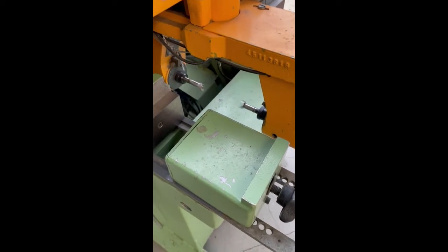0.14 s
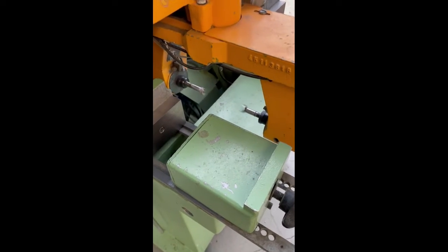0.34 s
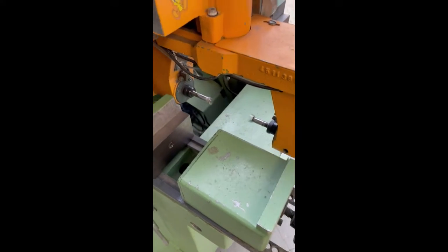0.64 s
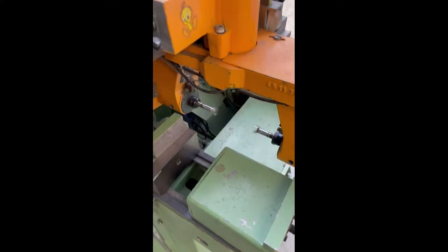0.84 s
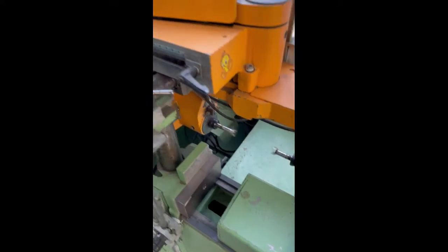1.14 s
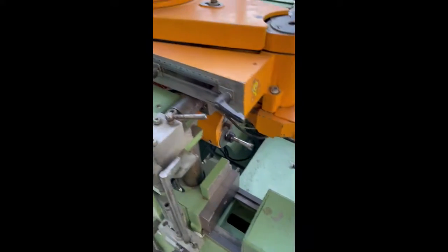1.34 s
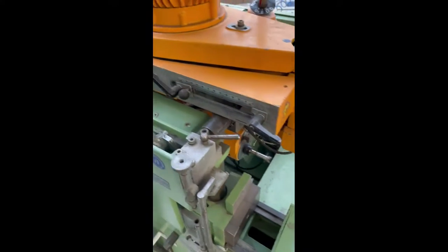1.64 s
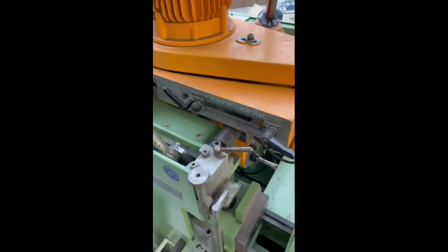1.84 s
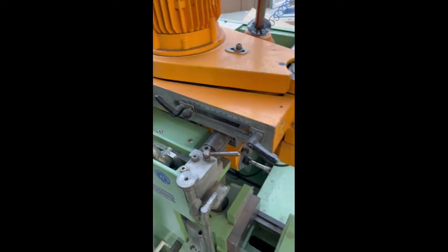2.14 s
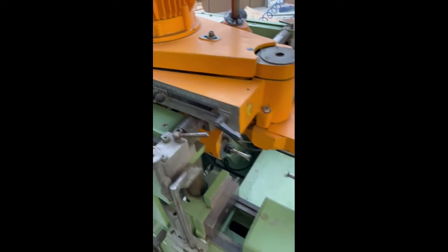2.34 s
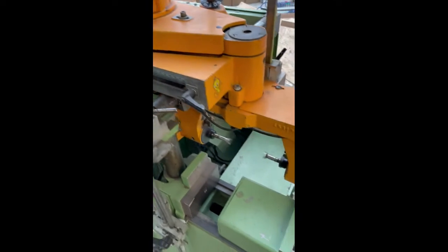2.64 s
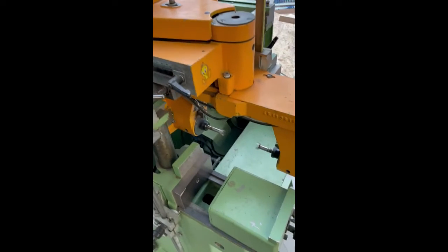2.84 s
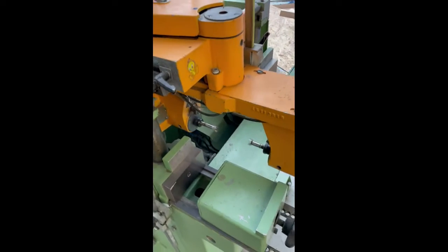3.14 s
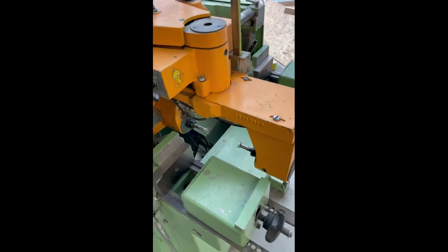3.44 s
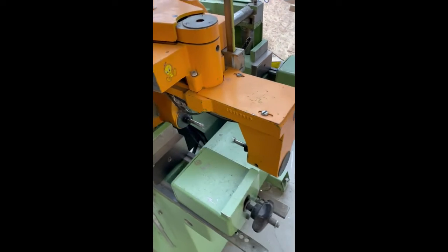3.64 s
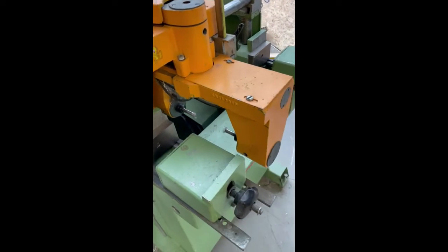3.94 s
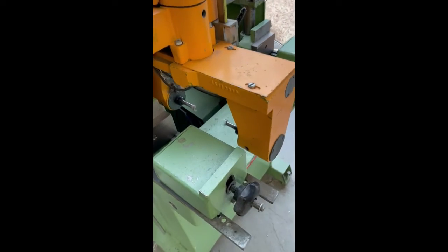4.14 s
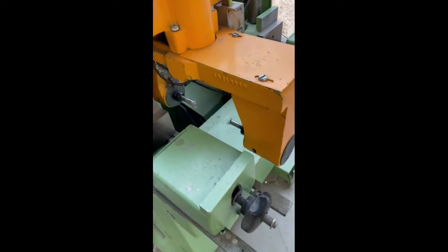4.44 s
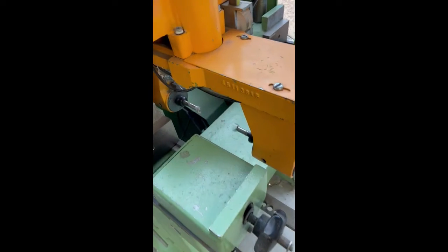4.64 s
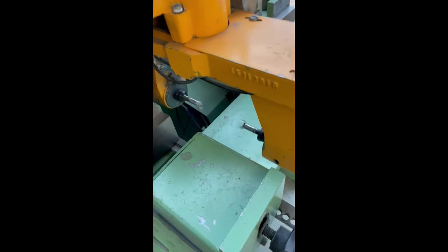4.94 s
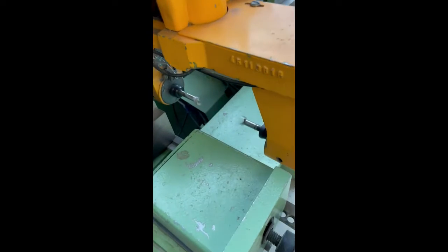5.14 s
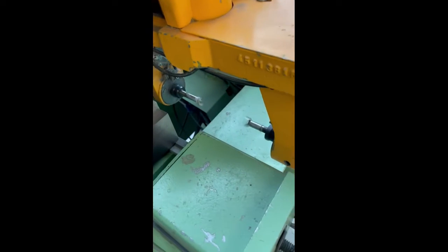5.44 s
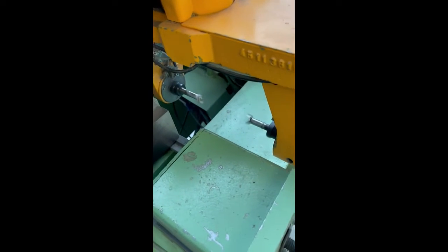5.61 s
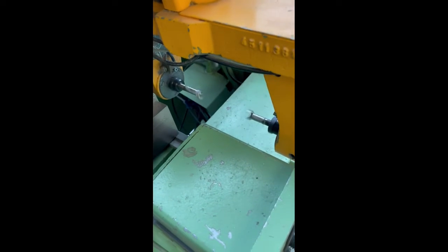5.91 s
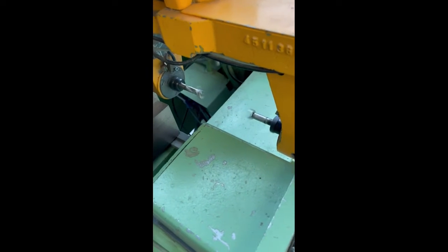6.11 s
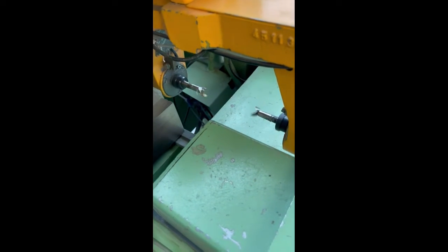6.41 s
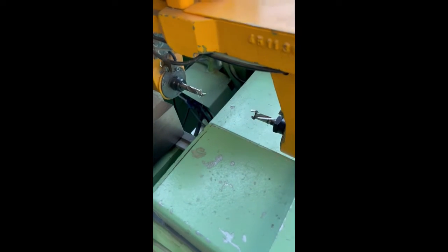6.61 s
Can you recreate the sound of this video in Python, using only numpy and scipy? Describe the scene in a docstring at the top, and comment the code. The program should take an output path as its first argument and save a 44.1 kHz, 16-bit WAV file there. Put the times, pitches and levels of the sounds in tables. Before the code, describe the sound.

Constant electric machine noise: a nasal, high whine near four kilohertz over a hum, with rough bearing hiss. Individual tones swell and fade as the handheld microphones move around the machine. Late on, a dull switch knock cuts the drive and the whine glides quickly downward, flaring on metal resonances. Soft knocks, a quiet hum, a thin whistle and broad workshop noise are left. Close, wide stereo.

```python
"""In a workshop, close to a belt-driven milling spindle: it runs at full speed, is switched off and coasts to rest.
Multiples of the shaft speed give the hum and the whine of a 24-tooth pulley; shaped noise gives the bearing roar.
As it slows, falling tones ring fixed resonances, and a steady hum and a high whistle come up and stay.
The handheld microphones wander, so each tone swells and fades; short dull bursts, gusts and shop noise lie around."""
import sys
import numpy as np
from scipy import signal
from scipy.fft import rfft, irfft, next_fast_len
from scipy.io import wavfile

SR = 44100
rng = np.random.default_rng(int(sys.argv[2]) if len(sys.argv) > 2 else 0)


def bounce(signal):
    """Save signal as a 16-bit WAV file at the path given by the first command-line argument."""
    frames = np.transpose(np.atleast_2d(signal))
    limited = np.clip(frames, -1, 1)
    pcm = np.round(limited * 32767).astype(np.int16)
    wavfile.write(sys.argv[1], SR, pcm)


N = 298557  # samples

# An order is a number of cycles per shaft turn. Swells are lists of (t/s, peak level/dB, 1/e half length/s).
# Crossings are (order, peak level/dB, 1/e spread/turns per s): a falling order meets a resonance.
# weaker spindle tones: order, level/dB at full speed
FAINT_ORDERS = [(1.2, -47), (1.495, -49), (2, -56), (3, -55), (4.5, -55.5), (5, -57.5), (8, -61), (9, -59),
                (22.8, -51), (23.7, -49.5), (24.3, -53), (26.55, -57), (28, -57), (30.1, -53), (33.5, -55),
                (39, -55)]
# shaft sidebands round the second and third tooth overtones: order, level/dB re that overtone's level
OVERTONE_2 = [(46, -1), (47, 0), (48, 0), (49, -1), (50, -4)]
OVERTONE_3 = [(68, -9), (69, -9), (70, -5), (74, -6), (75, -10)]
# casting resonances that gliding tones light up: f/Hz, width/Hz, lift/dB
CASTING = [(84, 24, 11), (115, 24, 5), (170, 16, 10.5), (240, 79, 9), (285, 50, 7), (870, 90, 7),
           (950, 80, 15), (1060, 70, 7), (1330, 400, 3), (1760, 110, 9.5), (1950, 80, 5), (2040, 50, -6),
           (2160, 220, 15), (2390, 90, -13), (2560, 60, 12), (2630, 40, -8), (2730, 110, 11),
           (2820, 40, -10), (3040, 290, 12), (3270, 130, 7), (3450, 120, -11), (3640, 150, 12),
           (3901, 163, 14.5), (5600, 160, -8), (5700, 1200, 17), (9500, 2100, 23), (11700, 380, 11.5)]
# noise colours, each scaled to unit power before use: f/Hz, density level/dB per Hz
RUMBLE_COLOUR = [(60, -25), (130, -14), (300, -5.5), (360, -13), (560, -7.5), (640, -8.5), (740, 0),
                 (860, -8.5), (1100, -6), (1350, -14.5), (1700, -18.5)]
ROAR_COLOUR = [(1100, -52), (1400, -15), (1800, -6.5), (2300, -4.5), (2900, -19.5), (3400, 3), (3850, 3),
               (4400, 1), (5000, -1), (5800, -4.5), (7000, -1.5), (8200, -13)]
HISS_COLOUR = [(6600, -42), (7000, -25), (7600, -16), (8300, 1.5), (8800, 5.5), (10500, 0), (11600, 4.5),
               (12500, 2.5), (13400, 4), (14200, -6), (15000, 9.5), (16500, 9.5)]
WORKSHOP_COLOUR = [(100, -25), (750, -11), (1200, -6), (2500, 1), (3500, 1.5), (4000, -11), (5800, 5.5),
                   (7000, -2.5), (8500, 1), (10800, 3.5), (11650, -6), (12500, 5), (13700, -2),
                   (14300, 7.5), (16500, 4)]
COVER_COLOUR = [(1450, -10.0), (1750, 3.5), (2000, -8)]
RASP_COLOUR = [(4500, -22), (4850, 3.5), (5400, 5.0), (5900, -10)]
HOUSING_COLOUR = [(2500, -7.0), (2800, 1.0), (3200, 3.0), (3500, -29)]
WIND_COLOUR = [(30, -40), (45, -8.0), (80, -5.0), (130, -1.5), (170, -3)]
# steady tones left after the switch-off: f/Hz, level/dB
AFTER_TONES = [(204.6, -52.5), (413, -53.5), (619.1, -53), (705.2, -46), (829.0, -46.5), (1599, -58.5),
               (2013, -55), (3295, -61), (3488, -54), (5787, -52), (9981, -56), (11353, -58), (11510, -53),
               (11547, -47), (11579, -47), (11612, -50), (11644, -47), (11676, -40.5), (11740, -52),
               (11800, -51), (12026, -52)]
# short dull bursts, knocks and last flares of the falling tones: t/s, level/dB, f/Hz, t60/s
DULL_BURSTS = [(0.017, -28, 140, 0.11), (3.749, -35, 130, 0.41), (5.421, -34, 750, 0.087),
               (5.435, -42, 830, 0.079), (5.464, -24, 770, 0.042), (5.477, -35, 805, 0.12),
               (5.43, -39, 48, 0.24), (5.52, -44, 50, 0.15), (6.365, -43, 460, 0.14),
               (6.37, -36, 940, 0.11), (6.448, -39, 247, 0.16), (6.58, -41.5, 70, 0.22)]
# stereo image by pitch: f/Hz, left lead/rad, likeness/0-1, left re right level/dB
STEREO = [(20, 0, .997, 0), (70, 0, .99, 0), (170, -.08, .998, .4), (400, -.3, .97, 1.4),
          (780, -.5, .9, -2), (1100, -.3, .93, -2.7), (1500, -.1, .96, -1), (1800, 0, 1, 0),
          (2250, 0, 1, 0), (3000, 1.3, .5, -1), (3500, .5, .45, 0), (3850, .4, .8, -.5), (4500, 0, .1, 0),
          (4900, -.9, .4, .5), (5400, .3, .72, .5), (6800, 2.7, .75, 0)]
# stereo image above 7 kHz, with bands in step or opposed: f/Hz, left lead/half turns, likeness/0-1
STEREO_HIGH = [(6980, 1, 1), (8230, 1, 1), (8450, 1.15, .72), (10200, 1.8, .78), (10420, 2, 1),
               (11330, 2, 1), (11900, 2.25, .8), (13600, 2.87, .78), (13850, 3, 1), (14500, 3, 1),
               (15000, 3.13, .85), (16500, 3.4, .8)]
# tooth tone at the wandering microphones: t/s, level/dB at full speed
WHINE = [(0.0, -28.5), (0.15, -26.5), (0.49, -28), (0.63, -29.5), (0.68, -33.5), (0.88, -35.5),
         (0.93, -32.5), (1.09, -33.5), (1.2, -52), (1.3, -35.5), (1.52, -28), (1.65, -28), (1.81, -35),
         (2.01, -37), (2.17, -30), (2.26, -33), (2.39, -31), (2.45, -49), (2.48, -44), (2.63, -32),
         (2.83, -29.5), (3.22, -30.5), (3.35, -35.5), (3.56, -32.5), (3.62, -31.5), (3.79, -34.5),
         (3.84, -45), (3.97, -33), (4.02, -44), (4.19, -40), (4.27, -49), (4.3, -50), (4.47, -57),
         (4.56, -38), (5.3, -24.5)]
# once-per-turn hum: t/s, level/dB at full speed
HUM = [(0, -46), (.5, -36.5), (1.7, -37.5), (1.87, -41.5), (2.5, -40), (3.2, -35), (3.7, -38.5),
       (3.81, -47), (3.95, -40), (4.93, -40), (5.1, -46), (5.3, -47)]
# spindle tones that swell as the microphones wander: order
SWELLING_ORDERS = 1.8, 2.555, 3.6, 6, 18, 19, 20, 21, 22, 23, 25, 26, 27, 29.11, 71, 72, 73
# one row for each of those orders: resting level/dB, swells
ORDER_SWELLS = [(-48.5, [(.25, -46, 0.31), (2.3, -50, 0.5), (5.3, -42, 1)]), (-59.5, [(2.2, -50.5, 0.71)]),
                (-58.5, [(1.6, -49.5, 0.78), (3.8, -49, 0.6)]), (-78, [(.6, -55, 1.2), (2.8, -73, 0.37),
                (4.4, -46.5, 1.4)]), (-54, [(.4, -46.5, 0.73), (1.4, -53, 0.18), (2.6, -45, 0.32),
                (3.75, -44.5, 0.13), (4.3, -44.5, 0.38), (4.75, -47, 0.18)]), (-68, [(1.1, -46, .3),
                (2.9, -47.5, .5), (4.3, -55.5, 0.45)]), (-64, [(.7, -44.5, .7), (2.5, -43, .2),
                (3.1, -48, 0.25), (4.0, -49, 0.32), (5.1, -51, .4)]), (-68, [(.3, -52, 0.26),
                (1.5, -45.5, 0.32), (2.3, -47, 0.19), (2.8, -48, .3), (3.7, -48, .15), (4.5, -52, 0.27),
                (5.2, -40.5, 0.33)]), (-53, [(.4, -42, .5), (1.5, -53, 0.23), (2.8, -47, 0.16),
                (4.1, -40.5, 0.16), (4.7, -45, .15)]), (-54, [(.45, -38, 0.42), (1.15, -43, .15),
                (1.95, -37, 0.25), (2.7, -41.5, .3), (3.7, -46, .12), (4.1, -47, .15), (5.15, -38, 0.45)]),
                (-51, [(1.05, -37, 0.11), (2.55, -41, .12), (2.95, -41.5, 0.4), (4.3, -42, 0.3),
                (5.1, -36.5, 0.34)]), (-67, [(.2, -45, 0.39), (1.1, -37, 0.46), (2.75, -43, 0.25),
                (3.4, -43.5, 0.22), (5.1, -46, 0.55)]), (-53, [(1.25, -50.5, 0.75), (2.4, -45, 0.24),
                (3.3, -49, 0.17), (5.1, -44, 0.46)]), (-74, [(1.4, -45.5, 0.45), (2.9, -45, 0.65)]),
                (-48.5, [(1.2, -50.5, 0.3), (2.5, -55, 0.62), (3.2, -50, .15), (4.2, -47, 0.25)]),
                (-55.5, [(.2, -39.5, 0.25), (.9, -41, 0.19), (1.4, -48, 0.63), (2.2, -42, .3),
                (2.95, -41, 0.17), (3.6, -57, .3), (5.2, -44, 0.11)]), (-63, [(.5, -44, 0.66),
                (1.15, -43, 0.32), (2.1, -47, 0.53), (3, -45, 0.38), (5.15, -46, 0.13)])]
# third tooth overtone, cover, rough band near 5 kHz, housing: resting level/dB, swells
OVERTONE_3_SWELLS = -55, [(.4, -47, .7), (2.95, -47, .35), (5.1, -49, 0.3)]
COVER_SWELLS = -69, [(1.7, -45.5, 0.81), (3.6, -51.5, 0.99)]
RASP_SWELLS = -63, [(1.9, -43.5, 0.58), (2.9, -44.5, 0.68), (5.1, -49, .3)]
HOUSING_SWELLS = -58, [(.6, -40, 0.72), (2.9, -43.5, 0.67), (4.2, -45, 0.76), (5.3, -40, 0.5)]
# closeness to the bearings: t/s, level/dB added to their noise
NEARNESS = [(0, 1), (.9, 1), (2.1, -1.2), (3.05, -1), (4.1, -2.5), (4.6, 0), (5.3, 4), (5.6, 5.5),
            (6.77, 7)]
# microphone drift towards the machine: t/s, speed/m per s
APPROACH = [(0, -.07), (.5, .04), (.75, -.13), (1.1, -.21), (1.6, -.2), (2.1, .05), (2.7, .07), (3.3, -.13),
            (3.55, -.13), (3.75, .09), (4.3, .16), (4.7, .06), (5.3, .08)]
# crossings of seven resonances
BOOM_CROSSINGS = [(1.65, -50, 15), (1.95, -42, 17), (2.57, -45, 6), (3.2, -51, 9), (4.1, -48, 14),
                  (5.2, -49, 4.5), (24, -54, 4.5)]
GUARD_CROSSINGS = [(16.3, -49, 4), (17.2, -48, 3), (18.1, -38, 2.6), (19.4, -42, 3.5), (21.2, -45, 2.5),
                   (24, -45, 5), (48, -56, 13)]
PANEL_CROSSINGS = [(45, -45, 2), (47.8, -38, 3), (53, -46, 3)]
BRACKET_CROSSINGS = [(33, -47, 8), (39, -50, 8), (48, -48, 5)]
LID_CROSSINGS = [(32, -46, 7), (36, -47, 7)]
COVER_CROSSINGS = [(24, -39, 2.7), (47.2, -47.5, 2.6)]
HOUSING_CROSSINGS = [(23.9, -35, 12), (46.5, -38, 7)]
# narrow and broad bearing bands, forward as the microphones pass: f/Hz, width/Hz, resting level/dB, swells
RINGING_BANDS = [(4825, 84, -52, [(1.3, -42, 0.17), (5.1, -53, .2)]), (4900, 130, -54, [(2.7, -45, .1)]),
                 (5415, 190, -57.5, [(2.0, -52, .4), (4.9, -51, .3)]), (6000, 250, -64, [(0.4, -52, 0.5)]),
                 (11500, 2000, -44, [(.9, -38, 0.76), (3, -46, .3), (5.2, -49, .2)])]
# gusts over the microphones: t/s, peak level/dB
GUSTS = [(0.0, -45), (0.2, -50), (0.46, -49), (1.05, -54), (1.75, -54), (3.74, -47.5), (5.47, -50),
         (5.77, -53.5), (6.2, -51.5), (6.77, -52)]

FULL_TPS, OFF_S = 160.18, 5.316  # full speed in turns per s, switch-off
FRICTION_TPS2, DRAG_PER_TURN = 117, .00165  # braking
# fading in dB per decade of speed, down to this share of full speed; orders below 10 lose only a part of it
SLOWING_DB, SLOWEST_SHARE, LOW_SLOWING_SHARE = 35.5, .37, .5
STOP_TPS = 20  # below this speed the tones fade further, in proportion to speed
BELT_LOSS_DB = 80  # orders between 1 and 2 die with the cube of the speed lost
OVERTONE_2_DB, OVERTONE_LOSS_DB = -41.5, 13  # level at full speed; extra loss of both overtones by standstill
SIDEBAND_LOSS_DB = 2.5  # off load, per order away from the tooth tones
SIDEBAND_SHAKE_RAD, MOTOR_THROB_DB = .7, 2.5  # phase flutter; throb once per motor turn
SOUND_M_PER_S = 343
RUMBLE_DB, ROAR_DB, HISS_DB, SHOP_DB = -43, -36, -32.5, -35  # at full speed, before nearness
RUMBLE_LOSS_DB, ROAR_LOSS_DB, HISS_LOSS_DB, HOUSING_LOSS_DB = 6, 18.5, 24, 14  # by standstill
RUMBLE_NEAR = .36  # share of the nearness that the bass follows
# f/Hz, width/Hz
BOOM, GUARD, PANEL, BRACKET, LID = (238, 28), (2110, 69), (3700, 42), (4400, 60), (4850, 60)
BOOM_CORE_DB, GUARD_CORE_DB = 6, 2  # steady tone re the noise of its resonance
COVER_HZ, HOUSING_HZ, HOUSING_RATTLE_DB = 1750, 3000, 6  # rattle depth is reached at standstill
RINGING_FLICKER_DB, RINGING_LOSS_DB = 2, 60  # spread; loss by standstill
AFTER_S, AFTER_RISE_S = 5.4, .026
WHISTLE_LATER_S, WHISTLE_RISE_S = .09, .12
CALM_DB, GUST_RISE_DB_PER_S, GUST_FALL_DB_PER_S = -60, 122, 32
CUTOFF_HZ = 15740


def spindle_tones():
    """Every tone is a multiple of the shaft speed; coasting, they fade with speed and flare at resonances."""
    speed = shaft_speed()
    # moving towards the machine raises every spindle pitch a little
    heard_speed = speed * (1 + in_time(APPROACH) / SOUND_M_PER_S)
    turns = np.cumsum(heard_speed) / SR
    coarse_speed = speed[::50]
    coarse_share = coarse_speed / FULL_TPS
    loose = np.clip(20 * (1 - speed / FULL_TPS), 0, 1)  # off load, the belt flaps and the tones turn rough
    slowing_db = SLOWING_DB * np.log10(np.clip(coarse_share, SLOWEST_SHARE, 1))
    stopping_db = 20 * np.log10(np.clip(coarse_speed / STOP_TPS, 1e-3, 1))

    def coast_db(order):
        """Change of level from full speed."""
        fading_db = slowing_db * (LOW_SLOWING_SHARE if order < 10 else 1) + stopping_db
        flare_db = casting_db(order * coarse_speed) - casting_db(order * FULL_TPS)
        belt_db = BELT_LOSS_DB * (1 < order < 2) * (1 - coarse_share) ** 3
        return np.repeat(fading_db + flare_db - belt_db, 50)[:N]

    throb_db = MOTOR_THROB_DB * np.sin(2 * np.pi * turns / 5)
    lead = [(1, in_time(HUM)), (24, in_time(WHINE))]
    lead += [(order, swelling(*row)) for order, row in zip(SWELLING_ORDERS, ORDER_SWELLS)]
    out = np.zeros((2, N))
    for order, level_db in lead:
        high = order > 6
        sideband = high and order != 24
        from_tooth = abs((order + 12) % 24 - 12)  # orders to the nearest multiple of 24
        sideband_db = (throb_db - SIDEBAND_LOSS_DB * loose * from_tooth) * sideband
        waver_db = .9 + .7 * sideband + .6 * loose * high
        out += tone(order * turns, level_db + coast_db(order) + sideband_db, waver_db,
                    rate_hz=18., shake_rad=SIDEBAND_SHAKE_RAD * sideband)
    for order, level_db in FAINT_ORDERS:
        high = order > 6
        loose_db = 2 * SIDEBAND_LOSS_DB * loose * high
        out += tone(order * turns, level_db + coast_db(order) - loose_db, 1.5 + 1.2 * high,
                    rate_hz=2., shake_rad=SIDEBAND_SHAKE_RAD * high)

    dulled_db = OVERTONE_LOSS_DB * (speed / FULL_TPS - 1)
    second_db = OVERTONE_2_DB + coast_db(48) + dulled_db
    third_db = swelling(*OVERTONE_3_SWELLS) + coast_db(72) + dulled_db
    for order, relative_db in OVERTONE_2:
        loose_db = SIDEBAND_LOSS_DB * loose * (order == 50)
        out += tone(order * turns, second_db + relative_db - loose_db, 2 + 1.5 * loose, rate_hz=25.)
    for order, relative_db in OVERTONE_3:
        out += tone(order * turns, third_db + relative_db, 3.5, rate_hz=3., shake_rad=SIDEBAND_SHAKE_RAD)
    return out


def shaft_speed():
    """Turns per s: full speed, then braked by steady friction and by air drag that grows as speed squared."""
    scale = np.sqrt(FRICTION_TPS2 / DRAG_PER_TURN)
    rate = np.sqrt(FRICTION_TPS2 * DRAG_PER_TURN)
    coasting_s = np.maximum(np.arange(N) / SR - OFF_S, 0)
    return scale * np.tan(np.maximum(np.arctan(FULL_TPS / scale) - rate * coasting_s, 0))


def casting_db(hz):
    """Lift that the resonances of the machine body give a tone at this pitch."""
    return sum(db / (1 + (2 * (hz - centre_hz) / width_hz) ** 2) for centre_hz, width_hz, db in CASTING)


def bearing_noise():
    """Rumble, roar and hiss throb with the shaft or the motor, a fifth as fast, and sink with speed."""
    speed, near_db = shaft_speed(), in_time(NEARNESS)
    lost = 1 - speed / FULL_TPS
    angle = 2 * np.pi * np.cumsum(speed) / SR
    shaft, motor = np.sin(angle), np.sin(angle / 5)
    rumble_db = RUMBLE_DB - RUMBLE_LOSS_DB * lost + RUMBLE_NEAR * near_db + .23 * shaft + .14 * drift(11.)
    roar_db = ROAR_DB - ROAR_LOSS_DB * lost + near_db + .5 * shaft + .067 * motor + 1.6 * drift(26.)
    hiss_db = HISS_DB - HISS_LOSS_DB * lost + near_db + .72 * shaft + 1. * motor
    out = from_db(rumble_db) * coloured(RUMBLE_COLOUR)
    out += from_db(roar_db) * coloured(ROAR_COLOUR)
    return out + from_db(hiss_db) * coloured(HISS_COLOUR)


def ringing():
    """Narrow and broad flickering bands of bearing noise; they sink quickly once the drive is off."""
    out, white = np.zeros((2, N)), rng.standard_normal((2, N))
    lost = 1 - shaft_speed() / FULL_TPS
    for hz, width_hz, rest_db, swells in RINGING_BANDS:
        level_db = swelling(rest_db, swells) + RINGING_FLICKER_DB * drift(9.) - RINGING_LOSS_DB * lost
        out += from_db(level_db) * noise_band(hz, width_hz, white)
    return out


def rasp():
    """A rough band of noise near 5 kHz that swells, then sinks with speed."""
    lost = 1 - shaft_speed() / FULL_TPS
    return from_db(swelling(*RASP_SWELLS) - ROAR_LOSS_DB * lost) * coloured(RASP_COLOUR)


def cover():
    """Noise of the cover swells as the microphones wander, and again as falling orders cross its resonance."""
    gain = from_db(swelling(*COVER_SWELLS)) + from_db(crossed(COVER_HZ, COVER_CROSSINGS))
    return gain * coloured(COVER_COLOUR)


def housing():
    """Noise of the housing; falling orders shake it and it throbs once per turn, deeper as the shaft slows."""
    speed = shaft_speed()
    lost = 1 - speed / FULL_TPS
    shaft = np.sin(2 * np.pi * np.cumsum(speed) / SR)
    shaken_db = crossed(HOUSING_HZ, HOUSING_CROSSINGS) + HOUSING_RATTLE_DB * lost * shaft
    gain = from_db(swelling(*HOUSING_SWELLS) - HOUSING_LOSS_DB * lost) + from_db(shaken_db)
    return gain * coloured(HOUSING_COLOUR)


def shaken_parts():
    """While the speed falls, rough drive forces ring five fixed resonances; boom and guard have a steady core."""
    out, now = np.zeros((2, N)), np.arange(N) / SR
    parts = [(BOOM, BOOM_CROSSINGS), (GUARD, GUARD_CROSSINGS), (PANEL, PANEL_CROSSINGS),
             (BRACKET, BRACKET_CROSSINGS), (LID, LID_CROSSINGS)]
    for (hz, width_hz), crossings in parts:
        out += from_db(crossed(hz, crossings)) * noise_band(hz, width_hz, rng.standard_normal((2, N)))
    boom_hz, guard_hz = BOOM[0], GUARD[0]
    out += tone(boom_hz * now, crossed(boom_hz, BOOM_CROSSINGS) + BOOM_CORE_DB, 2.)
    out += tone(guard_hz * now, crossed(guard_hz, GUARD_CROSSINGS) + GUARD_CORE_DB, 1.5, rate_hz=25.)
    return out * np.clip((now - OFF_S) / .11, 0, 1)


def after_tones():
    """A hum and then a whistle near 11.7 kHz come up as the spindle slows; the fainter high tones are rougher."""
    out, now = np.zeros((2, N)), np.arange(N) / SR
    for hz, level_db in AFTER_TONES:
        whistle = hz > 9000
        start_s = AFTER_S + WHISTLE_LATER_S * whistle
        rise_s = WHISTLE_RISE_S if whistle else AFTER_RISE_S
        waver_db = 2.3 + 1.2 * (hz > 3000) * (level_db < -42)
        out += np.clip((now - start_s) / rise_s, 0, 1) * tone(hz * now, level_db, waver_db, rate_hz=25.)
    return out


def dull_bursts():
    """Knocks, and last flares of the falling tones: each a dying puff of noise in one broad band."""
    out = np.zeros((2, N))
    age = np.arange(int(.15 * SR)) / SR
    for s, level_db, hz, t60 in DULL_BURSTS:
        start = int(s * SR)
        band = signal.butter(1, [hz * .94, hz * 1.08], "band", fs=SR, output="sos")
        puff = rms_one(signal.sosfilt(band, rng.standard_normal((2, len(age)))))
        rise = np.minimum(age * hz / 2.5, 1)  # over two and a half cycles
        out[:, start:start + len(age)] += puff * from_db(level_db - 60 * age / t60) * rise
    return out


def wind():
    """Air moving over the microphones: low noise in gusts that rise fast and die slowly."""
    now = np.arange(N) / SR
    gusts_db = [db - np.maximum(GUST_RISE_DB_PER_S * (s - now), GUST_FALL_DB_PER_S * (now - s)) for s, db in GUSTS]
    level_db = np.maximum(np.max(gusts_db, axis=0), CALM_DB)
    return from_db(level_db + 1.1 * drift(20.)) * coloured(WIND_COLOUR)


def workshop():
    """Steady broad noise of the room."""
    return from_db(SHOP_DB) * coloured(WORKSHOP_COLOUR)


def stereo_image(near, far):
    """Left and right share one path and take the other with opposite signs; lead and balance depend on pitch."""
    size = next_fast_len(N)
    rows = STEREO + [(hz, np.pi * half_turns, alike, 0) for hz, half_turns, alike in STEREO_HIGH]
    edge_hz, *columns = np.transpose(rows)
    hz = np.arange(size // 2 + 1) * SR / size
    lead_rad, alike, pan_db = [np.interp(hz, edge_hz, column) for column in columns]
    alike = np.clip(alike, 0, 1)
    shared = np.sqrt((1 + alike) / 2) * rfft(near, size)
    own = np.sqrt((1 - alike) / 2) * rfft(far, size)
    turn = from_db(pan_db / 2) * np.exp(.5j * lead_rad)  # half to the left, the inverse to the right
    return irfft(np.array([(shared + own) * turn, (shared - own) / turn]), size)[:, :N]


def tone(turns, level_db, waver_db, rate_hz=6.2, shake_rad=0):
    """A sine on two paths; the reflected one slides in phase as the microphones move."""
    gain = np.sqrt(2) * from_db(level_db + waver_db * drift(rate_hz))
    flutter = shake_rad * drift(11.) if shake_rad else 0
    angle = 2 * np.pi * (turns + rng.random()) + flutter
    return gain * np.array([np.sin(angle), np.sin(angle + 3 * drift(1.2))])


def noise_band(hz, width_hz, white):
    """Noise through one band-pass, at unit power."""
    band = signal.butter(2, [hz - width_hz / 2, hz + width_hz / 2], "band", fs=SR, output="sos")
    return rms_one(signal.sosfilt(band, white))


def coloured(spectrum):
    """Two unrelated noises of one colour, next to nothing outside the table; unit power."""
    size = next_fast_len(N)
    hz = np.arange(1, size // 2 + 2) * SR / size
    edge_hz, density_db = np.transpose(spectrum)
    gain = from_db(np.interp(np.log(hz), np.log(edge_hz), density_db, -90, -90))
    return rms_one(irfft(rfft(rng.standard_normal((2, size))) * gain, size)[:, :N])


def drift(rate_hz):
    """Slow chance of spread 1: noise through two equal poles at this corner, one value per 100 samples."""
    r = np.exp(-200 * np.pi * rate_hz / SR)
    slow = signal.lfilter([1], [1, -2 * r, r * r], rng.standard_normal(N // 100 + 2002))[2000:]
    return np.interp(np.arange(N) / 100, np.arange(len(slow)), rms_one(slow - slow.mean()))


def swelling(rest_db, swells):
    """Level while the microphones wander; it holds from the switch-off on."""
    return bells(np.minimum(np.arange(N) / SR, OFF_S), rest_db, swells)


def crossed(hz, crossings):
    """Level of a resonance as the falling orders pass through it."""
    return bells(shaft_speed(), -82, [(hz / order, db, spread) for order, db, spread in crossings])


def bells(x, rest_db, rows):
    """A resting level in dB with bell-shaped rises (centre, peak dB, half width) along x, added as power."""
    coarse = x[::50]
    power = 10 ** (rest_db / 10)
    power = power + sum(10 ** (db / 10) * np.exp(-((coarse - at) / half) ** 2) for at, db, half in rows)
    return np.interp(np.arange(N) / 50, np.arange(len(coarse)), 10 * np.log10(power))


def in_time(rows):
    """A curve of (t/s, value), sample by sample."""
    s, value = np.transpose(rows)
    return np.interp(np.arange(N) / SR, s, value)


def from_db(db):
    """Decibels to gain."""
    return np.exp(np.asarray(db) * (np.log(10) / 20))


def rms_one(x):
    """Scaled to unit power."""
    return x / np.sqrt(np.mean(x ** 2) + 1e-20)


def scene():
    """All sources, spread over the stereo image."""
    machine = spindle_tones() + bearing_noise() + ringing() + rasp() + cover() + housing() + shaken_parts()
    surroundings = after_tones() + dull_bursts() + wind() + workshop()
    near, far = machine + surroundings
    return stereo_image(near, far)


def record(dry):
    """A steep elliptic low-pass cuts the top."""
    return signal.sosfilt(signal.ellip(14, .2, 75, CUTOFF_HZ, fs=SR, output="sos"), dry)


dry = scene()
out = record(dry)
bounce(out)
```